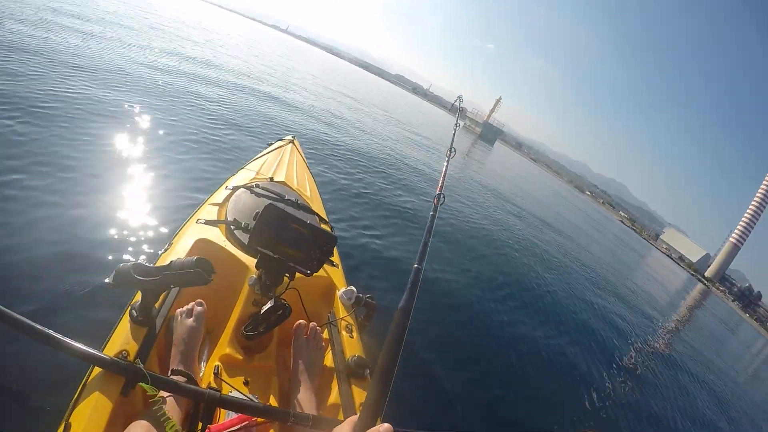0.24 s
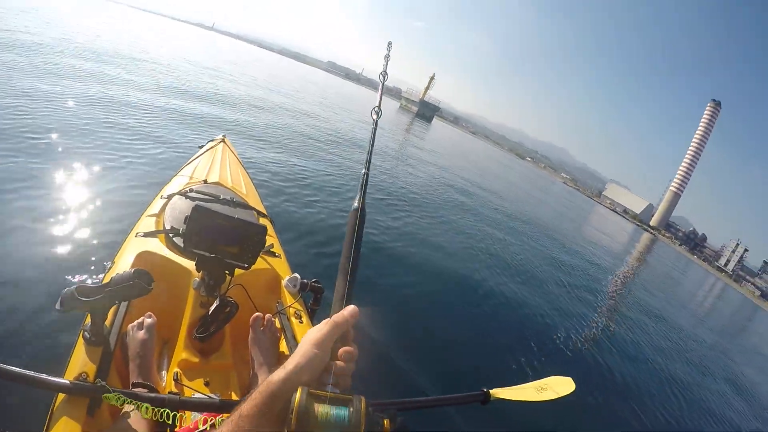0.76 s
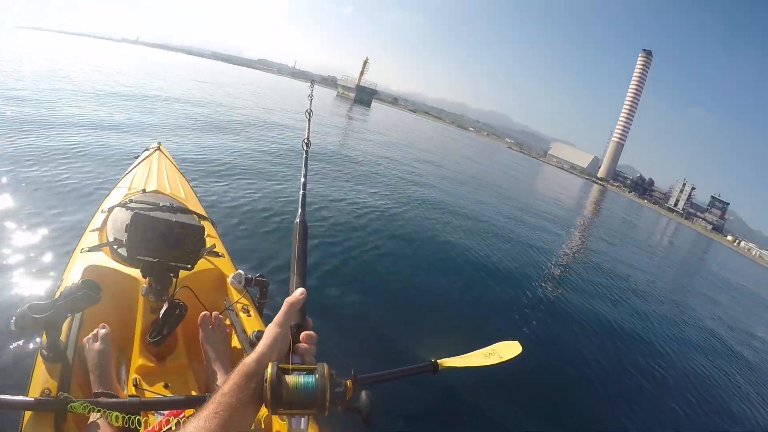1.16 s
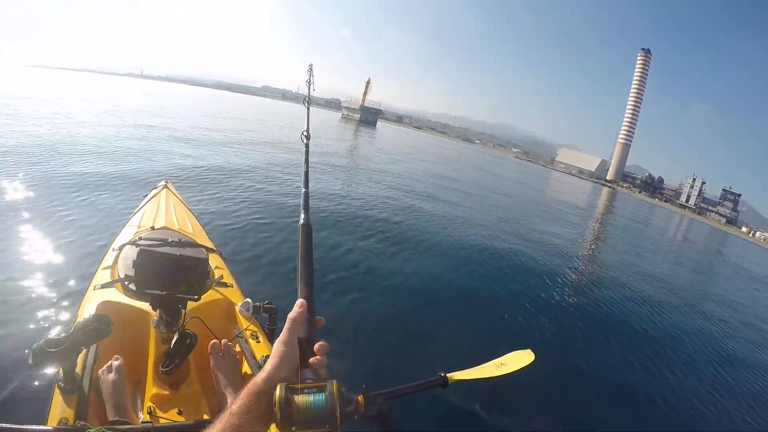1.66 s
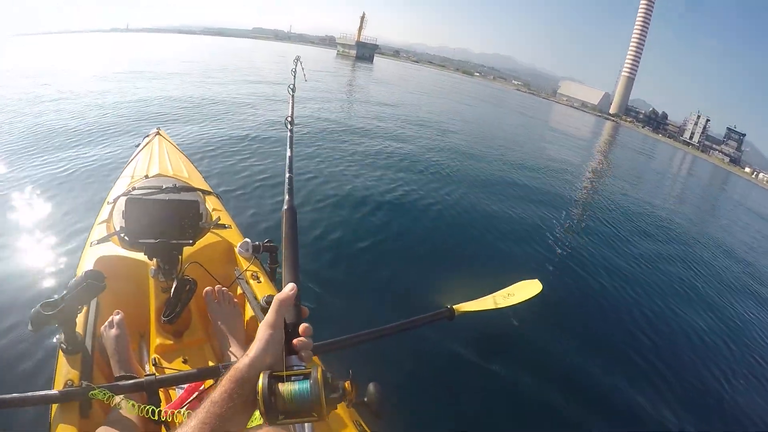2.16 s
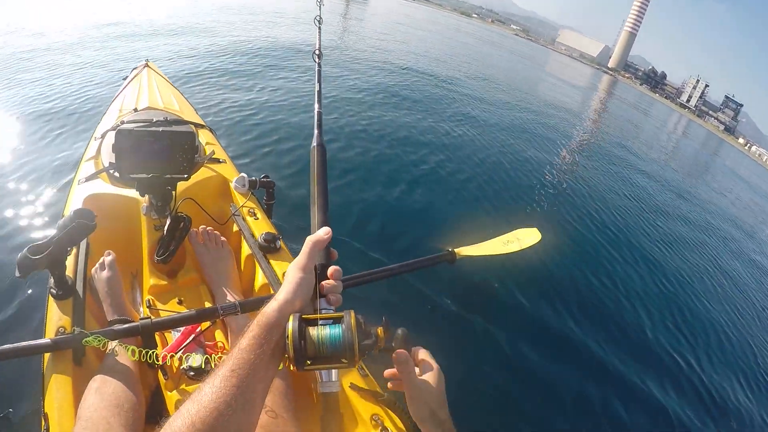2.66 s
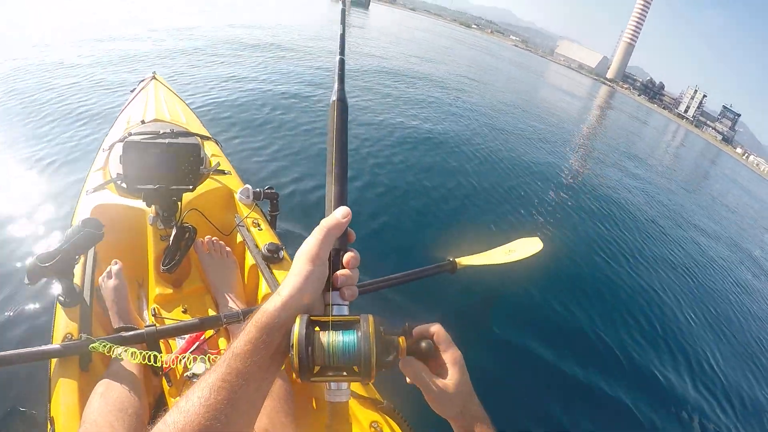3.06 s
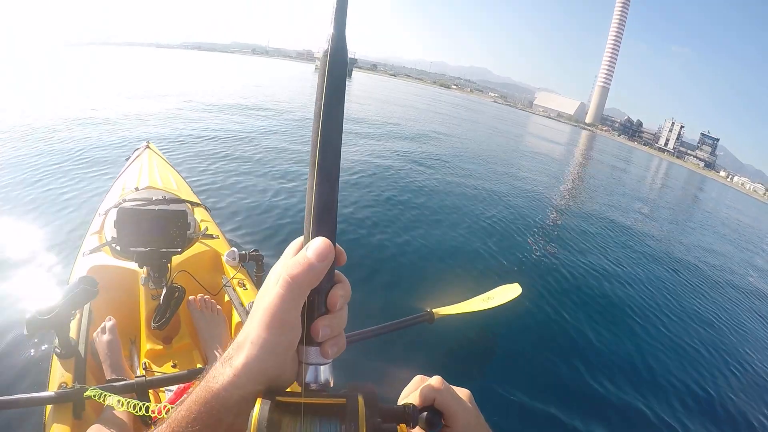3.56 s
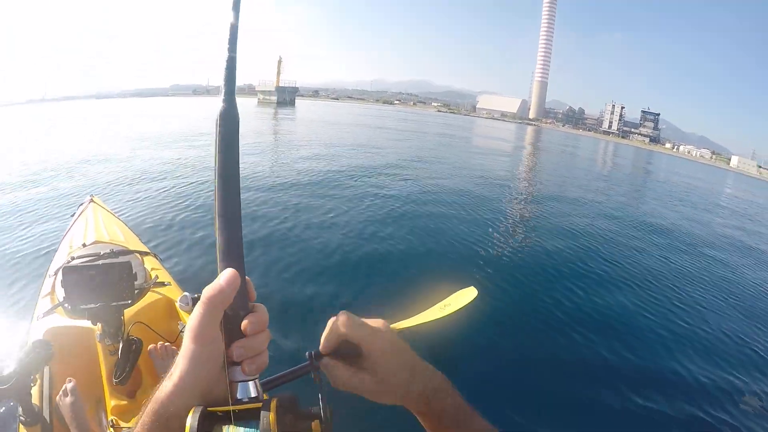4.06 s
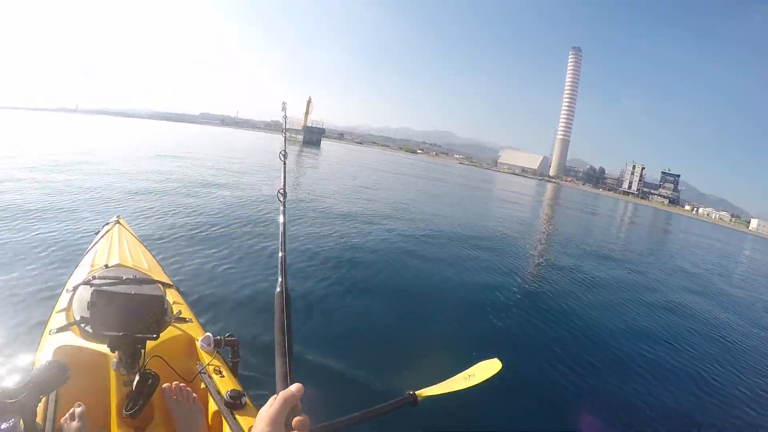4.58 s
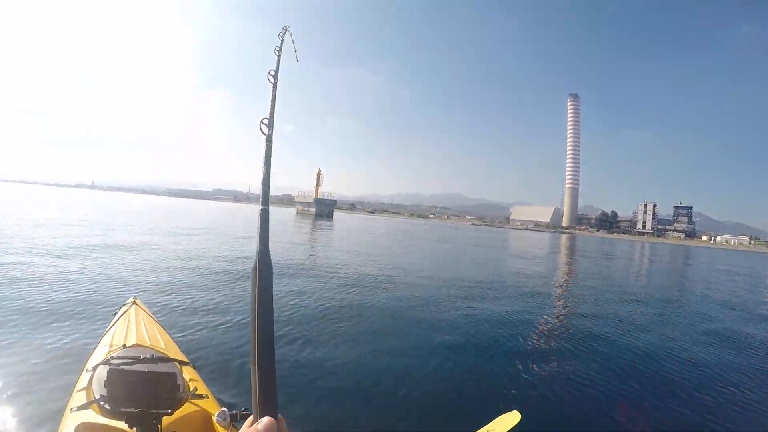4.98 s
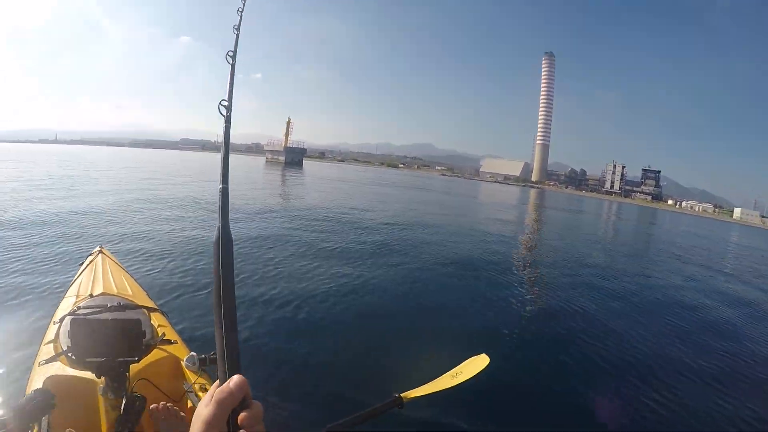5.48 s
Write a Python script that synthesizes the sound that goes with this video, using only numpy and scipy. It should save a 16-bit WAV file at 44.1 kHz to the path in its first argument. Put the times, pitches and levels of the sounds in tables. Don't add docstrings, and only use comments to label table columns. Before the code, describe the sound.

Outdoors on calm water in a kayak, low wind rumble buffets a close body-worn camera microphone with faint hiss. A few dull hull taps and soft line rubbing come first, then a reel clicker ratchets in four short metallic runs: slow, smooth, hard and uneven, then jerky and fastest. A light tap and a firm knock come just before the last run.

```python
import sys
import numpy as np
from scipy import signal
from scipy.fft import rfft, irfft, next_fast_len
from scipy.io import wavfile
from scipy.ndimage import uniform_filter1d, map_coordinates

SR = 44100
rng = np.random.default_rng(int(sys.argv[2]) if len(sys.argv) > 2 else 0)


def volts_from_db(level):
    exponent = np.asarray(level, float) / 20
    return 10 ** exponent


def log_audio(samples):
    frames = np.atleast_2d(samples).T
    limited = np.clip(frames, -1, 1)
    pcm = np.round(limited * 32767).astype(np.int16)
    wavfile.write(sys.argv[1], SR, pcm)


N = 252693
CLICK_SAMPLES = 1600

# frequency in Hz, density in dB per Hz.
HISS_SPECTRUM = [(47, -32), (80, 5.5), (178, -0.5), (400, -7), (1100, -10.5), (1800, -12), (4000, -13.5),
                 (7000, -19), (9600, -22.5), (13000, -24), (15200, -25.5), (16400, -28)]
# time in seconds, level in dB.
HISS_LEVEL = [(0, -63), (.7, -61.5), (1.6, -63), (2.7, -63), (3.3, -63), (3.8, -63), (4.9, -62.5),
              (5.73, -60.5)]
# frequency in Hz, density in dB per Hz.
RUMBLE_SPECTRUM = [(7.1, -70), (12, 5.5), (27, 1.5), (42, 0), (62, -8.5), (81, -25.5), (100, -26.5),
                   (130, -36.5), (220, -120)]
# time in seconds, level in dB.
WIND_LEVEL = [(0.0, -47.5), (0.19, -38), (0.41, -49), (0.51, -34), (0.62, -43), (0.92, -35.5),
              (1.15, -42.5), (1.48, -38.5), (1.6, -43), (2.07, -38), (2.62, -44), (3.5, -40.5), (3.8, -40),
              (4.12, -34.5), (4.55, -35), (4.68, -40), (5.3, -36), (5.73, -33.5)]
# start in seconds, length in seconds, seat band in dB, plate band in dB.
LINE_RUBS = [
    (0.0, 0.16, -71.5, -76),
    (0.2, 0.08, -73, -77),
    (0.6, 0.18, -75, -70.5),
    (1.25, 0.65, -71.5, -81),
]
# time in seconds, low mode peak in dB, low mode in Hz,
# high mode level in dB, high mode in Hz.
TACKLE_TAPS = [
    (0.163, -29.5, 1030, -68, 2570),
    (0.234, -34, 1000, -68, 3230),
    (0.247, -37, 1000, -58, 2700),
    (0.308, -29, 1400, -41.5, 3600),
    (1.484, -71, 1420, -59, 3650),
    (2.794, -62, 600, -62, 3430),
    (3.763, -67, 1470, -59, 3460),
    (4.969, -45.5, 1340, -59, 3330),
    (5.18, -36, 1330, -47.5, 3100),
    (5.195, -27, 880, -47, 3260),
]
# frequency in Hz, density in dB per Hz.
SCRAPE_SPECTRUM = [(200, -38), (400, 1.5), (900, -3), (2000, -7), (3500, -3.5), (7000, -15.5), (10000, -28)]
# delay in seconds, level in dB.
REFLECTIONS = [(.0026, -18), (.0047, -15.5), (.0085, -36)]

# frequency in Hz, decay time t60 in seconds, then the level in dB in each of runs 1 to 4.
SEAT_MODES = [(1257, 0.014, -11, -12, 9.5, 8.5), (1380.5, 0.053, -2.5, -8.5, 4.5, 4.5),
              (1467, 0.025, -1, 1.5, 1, -1.5), (1698, 0.043, -2, -13, -16, -11),
              (2007, 0.008, -2, -27, 5.5, 11.5)]
PLATE_MODES = [(2640, 0.018, -11, -5.5, -12.5, -19), (2905, 0.022, -7, 2, -6, -6.5),
               (3330, 0.022, 1.5, 4, 1, -4), (3510, 0.016, -4, 5.5, -1, -3), (3665, 0.022, -2, 4, -2, -5),
               (3904, 0.019, -11, -2.5, -8, -8)]
UPPER_PLATE_MODES = [(4470, 0.014, -5, 3, 1.5, 4.5), (4777, 0.02, -1, 2.5, -0.5, -5),
                     (4860, 0.014, -13, -2, -2.5, -2), (5590, 0.029, -28, -2, -4.5, -1),
                     (5936, 0.016, -8.5, -15, -3.5, -3), (6470, 0.029, -20, -7, -15, -22),
                     (7230, 0.0056, -0.5, 7, -5, -21), (7564, 0.012, -6.5, 5.5, -5, 3),
                     (8160, 0.014, -11, -7, -7, 0)]
SPRING_MODES = [(9440, 0.016, -10, -14, -8, -8), (10040, 0.015, -5, -3, 1, 1),
                (10490, 0.012, -1, 1, -5, -4), (11350, 0.012, -15, -16, -4, -6),
                (11670, 0.0046, -5, -3, -18, -7), (12030, 0.0058, -12, -4, -19, -6),
                (12650, 0.006, -8, -11, -1, -3), (14100, 0.0062, -15, -18, -29, -17),
                (14200, .009, -26, -18, -18, -18)]
# frequency in Hz, density in dB per Hz.
CRACK_SPECTRUM = [(2200, -40), (2700, -0.5), (3400, 4), (5500, -5), (10000, -10), (13500, -17),
                  (15200, -5.5), (16300, -30)]
# time in seconds, speed in teeth per second.
SPOOL_SPEED = [
    [(0.7315, 41.1), (0.849, 88.8), (0.949, 68.7), (0.988, 67.6), (1.107, 82.6), (1.18, 52.7),
     (1.215, 47.7), (1.2211, 18)],
    [(2.0059, 37.4), (2.045, 58.1), (2.121, 114.7), (2.258, 135.6), (2.39, 138.4), (2.479, 105.3),
     (2.535, 68.2), (2.59, 46.2), (2.6076, 8.2)],
    [(3.8557, 20.9), (3.919, 58), (4.012, 94.8), (4.072, 161.3), (4.361, 145.9), (4.407, 217.2),
     (4.445, 113.6), (4.513, 145.9), (4.6721, 16)],
    [(5.209, 51), (5.36, 195.4), (5.386, 94.9), (5.462, 158), (5.546, 189.6), (5.585, 91.1), (5.642, 191.7),
     (5.654, 252.1), (5.7237, 122.2)],
]
CREEPING_TEETH = [1.2746, 4.7395]
# time in seconds, energy of one click in dB.
PAWL_LANDING = [
    [(0.732, -19.5), (0.76, -13), (0.877, -13), (0.928, -15.5), (1.093, -13.5), (1.17, -17), (1.221, -15),
     (1.275, -21)],
    [(2.006, -15), (2.088, -12.5), (2.2, -15), (2.25, -15), (2.37, -14.5), (2.516, -11), (2.608, -12)],
    [(3.856, -4.5), (3.91, -4), (3.96, -4.5), (4.083, -14.5), (4.38, -17.5), (4.435, -13.5), (4.491, -19.5),
     (4.672, -18.5), (4.739, -19.5)],
    [(5.209, -15), (5.239, -13.5), (5.334, -18.5), (5.402, -14), (5.449, -17.5), (5.543, -20.5),
     (5.584, -15.5), (5.636, -17), (5.724, -14.5)],
]
# rod seat in dB,
# upper plate in dB, pawl spring in dB, main plate mode in dB.
PART_LEVELS = [(-30.5, -18, -20, -1.5), (-31, -20, -18.5, -0.5), (-28.5, -16, -17.5, 1),
               (-27.5, -20, -21, 5)]
LANDING_GAIN = (0.014, 0.15, 0.38, 0.78)
OCTAVE_GAIN = (1.5, 0.45, 0.15, 0)
TURN_AWAY = (1.5, -1, -8.5, 1)


def unit(x):
    return x / np.sqrt(np.mean(x ** 2) + 1e-20)


def curve(rows, off_db=-120):
    s, db = np.transpose(rows)
    return volts_from_db(np.interp(np.arange(N) / SR, s, db, off_db, off_db))


def noise(spectrum):
    m = next_fast_len(N + 8192)
    hz, db = np.transpose(spectrum)
    log_hz = np.log(np.fft.rfftfreq(m, 1 / SR) + 1)
    gain = volts_from_db(np.interp(log_hz, np.log(hz + 1), db, -120, -120))
    return unit(irfft(rfft(rng.standard_normal(m)) * gain, m)[:N])


def wobble(rate):
    knots = rng.standard_normal(int(N * rate / SR) + 4)
    return map_coordinates(knots, [np.arange(N) * rate / SR])


def laid(times, rows):
    at = np.round(times * SR).astype(int)[:, None] + np.arange(CLICK_SAMPLES)
    return np.bincount(at.ravel(), rows.ravel(), N + CLICK_SAMPLES)[:N]


def camera():
    frame_hz, frame_phase = 59.94, 1.1
    frames = (1 + np.cos(2 * np.pi * frame_hz * np.arange(N) / SR + frame_phase)) ** 2.3
    whine_hz = 8420 + 90 * wobble(70)
    whine = np.sin(2 * np.pi * np.cumsum(whine_hz) / SR)
    buzz = volts_from_db(-80.0 + 1.4 * wobble(40)) * unit(frames * whine)
    return curve(HISS_LEVEL) * noise(HISS_SPECTRUM) + buzz


def wind():
    last = volts_from_db(-27) * np.exp(-((np.arange(N) / SR - 5.732) / 0.018) ** 2)
    rumble = unit(volts_from_db(0.8 * wobble(27)) * noise(RUMBLE_SPECTRUM))
    return curve(WIND_LEVEL) * rumble + last


def line():
    seat = noise([(1200, -16), (1380, -15.0), (1430, -5.5), (1490, -13), (1700, -23)])
    plate = noise([(2600, -14), (3200, -5), (3700, -3), (4200, -14), (5000, -12)])
    edge_s = 0.051
    t = np.arange(N) / SR
    seat_rub, plate_rub = np.zeros(N), np.zeros(N)
    for start, length, seat_db, plate_db in LINE_RUBS:
        inside_s = np.minimum(t - start, start + length - t)
        contact = np.clip(inside_s / edge_s + 0.5, 0, 1)
        seat_rub += contact * volts_from_db(seat_db)
        plate_rub += contact * volts_from_db(plate_db)
    return volts_from_db(2.4 * wobble(34.9)) * (seat_rub * seat + plate_rub * plate)


def taps():
    s, low_db, low_hz, high_db, high_hz = np.transpose(TACKLE_TAPS)[:, :, None]
    t = np.arange(CLICK_SAMPLES) / SR
    rise = 1 - np.exp(-t / 0.0018)
    on_hull = low_hz < 1150
    low_t60 = np.where(on_hull, 0.006, 0.013)
    low = volts_from_db(low_db - 60 * t / low_t60) * np.sin(2 * np.pi * low_hz * t)
    high = volts_from_db(high_db + 18 - 60 * t / 0.0084) * np.sin(2 * np.pi * high_hz * t)
    scrape_db = np.maximum(high_db, low_db - 7.5) + np.where(on_hull, -15.5, -3)
    scrape = volts_from_db(scrape_db - 60 * t / 0.024) * rise
    return laid(s[:, 0], (low + high) * rise) + noise(SCRAPE_SPECTRUM) * laid(s[:, 0] - 0.0012, scrape)


def tooth_times(rows):
    s, rate = np.transpose(rows)
    t = np.arange(s[0], s[-1], 1 / SR)
    passed = np.cumsum(np.interp(t, s, rate)) / SR
    return np.interp(np.arange(round(passed[-1]) + 1), passed, t)


def rings(modes, run, level_db, lag_s, rise_s, loose, main_db=None):
    drift_db, drift_rad, drift_pitch = 1.5, 0.45, 0.004
    scatter_db, scatter_rad, scatter_pitch = 1.3, 0.4, 0.005
    hz, t60 = np.transpose(modes)[:2]
    db = np.array(modes)[:, 2:].T[run]
    if main_db is not None:
        db[:, 2] += main_db
    t = np.maximum(np.arange(CLICK_SAMPLES) / SR - lag_s, 0)
    decay = volts_from_db(-60 * t / t60[:, None]) * (1 - np.exp(-t / rise_s))
    luck = rng.standard_normal((*db.shape, 5))
    slow = unit(uniform_filter1d(luck[..., 2:], size=9, axis=0))
    size = volts_from_db(db + loose * drift_db * slow[..., 0] + loose * scatter_db * luck[..., 0])
    energy = size ** 2 @ np.sum(decay ** 2, axis=1) / 2
    size = volts_from_db(level_db)[:, None] * size / np.sqrt(energy)[:, None]
    pitch = hz * (1 + drift_pitch * slow[..., 2] + loose ** 2 * scatter_pitch * luck[..., 3])
    offset = drift_rad * slow[..., 1] + loose * scatter_rad * luck[..., 1]
    phase = 2 * np.pi * pitch[..., None] * t + offset[..., None]
    return np.einsum("bm,mt,bmt->bt", size, decay, np.sin(phase.astype(np.float32)))


def crack(s, run, plate_db, upper_db):
    alike = 0.55
    t = np.arange(CLICK_SAMPLES) / SR
    puff = (volts_from_db(-60 * t / 0.019) + 0.022 * volts_from_db(-60 * t / 0.043)) * (1 - np.exp(-t / 0.00021))
    puffs = volts_from_db(plate_db + 1.16 * upper_db - 20.5)[:, None] * puff
    patterns = noise(CRACK_SPECTRUM)[:len(SPOOL_SPEED) * CLICK_SAMPLES].reshape(-1, CLICK_SAMPLES)
    repeated = laid(s, np.sqrt(alike) * patterns[run] * puffs)
    return repeated + np.sqrt(1 - alike) * noise(CRACK_SPECTRUM) * laid(s, puffs)


def clicker():
    s = np.sort(np.concatenate([tooth_times(rows) for rows in SPOOL_SPEED] + [CREEPING_TEETH]))
    run = np.searchsorted([rows[0][0] for rows in SPOOL_SPEED], s, "right") - 1
    speed = np.interp(s, *np.transpose(np.concatenate(SPOOL_SPEED)))
    octaves = np.log2(speed / 100)
    plate = np.interp(s, *np.transpose(np.concatenate(PAWL_LANDING)))
    usual_db = -15
    parts = np.array(PART_LEVELS)[run]
    parts = parts + np.outer(plate - usual_db, LANDING_GAIN) + np.outer(octaves, OCTAVE_GAIN)
    since_start = s - s[np.searchsorted(run, run)]
    parts[:, 1:3] += (np.array(TURN_AWAY)[run] * since_start)[:, None]
    parts[np.isin(s, CREEPING_TEETH), 3] += -19
    seat, upper, spring, main = (parts - np.outer(plate, [1, 1, 1, 0])).T
    plate = plate + 0.95 * rng.standard_normal(len(s))
    s = s - 0.0002 + 0.00004 * rng.standard_normal(len(s))
    sound = rings(PLATE_MODES, run, plate - 1.5, lag_s=0.000496, rise_s=0.00043, loose=1.0, main_db=1.26 * main)
    sound += rings(SEAT_MODES, run, plate + seat - 1.5, lag_s=0.001327, rise_s=0.00086, loose=2.27)
    sound += rings(UPPER_PLATE_MODES, run, plate + upper - 2.5, lag_s=0.000335, rise_s=0.00031, loose=1.4)
    sound += rings(SPRING_MODES, run, plate + spring - 2.5, lag_s=0.0001, rise_s=0.00028, loose=1.1)
    return laid(s, sound) + crack(s, run, plate, upper)


def nearby(x):
    dull = uniform_filter1d(x, size=3)
    return x + sum(volts_from_db(db) * np.pad(dull, (round(s * SR), 0))[:N] for s, db in REFLECTIONS)


def scene():
    return (camera() + wind() + line() + nearby(taps() + clicker()))[None]


def roll_off(x):
    return signal.sosfilt(signal.butter(12, 16520, fs=SR, output="sos"), x)


def record(dry):
    top = signal.butter(N=8, Wn=15300, fs=SR, output="sos")
    return roll_off(signal.sosfilt(top, dry))


dry = scene()
out = record(dry)
log_audio(out)
```